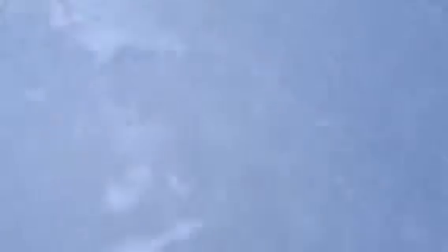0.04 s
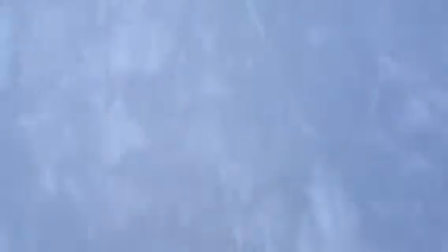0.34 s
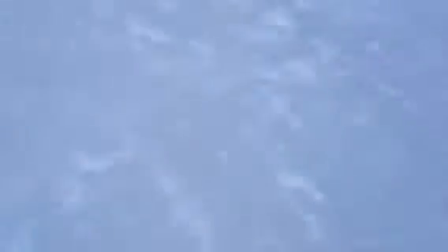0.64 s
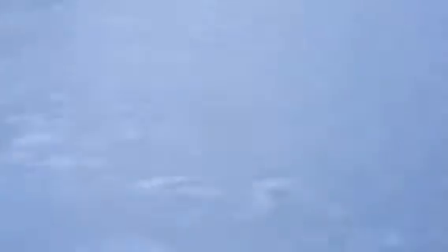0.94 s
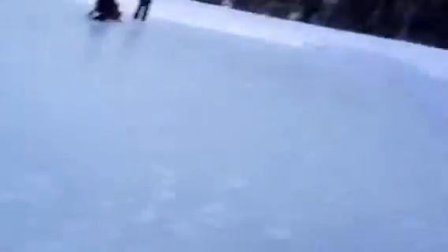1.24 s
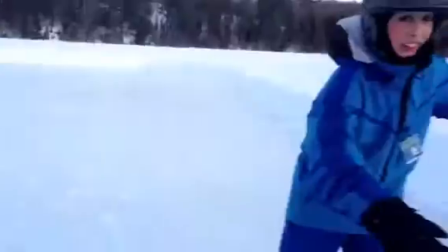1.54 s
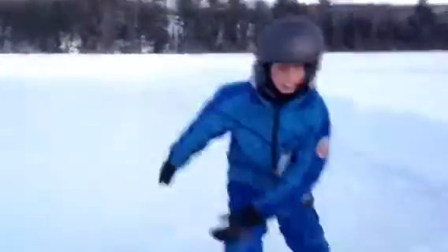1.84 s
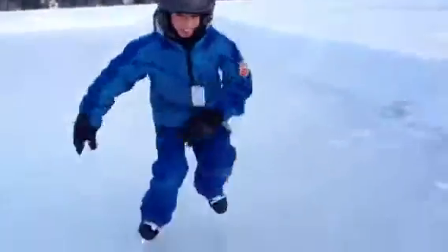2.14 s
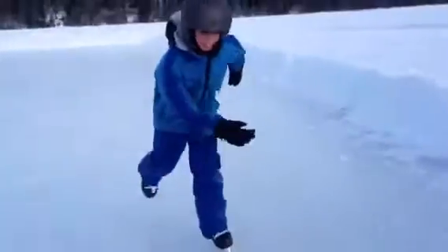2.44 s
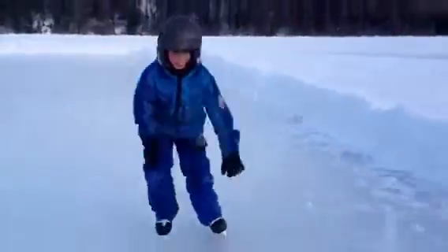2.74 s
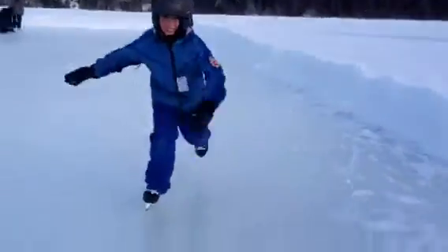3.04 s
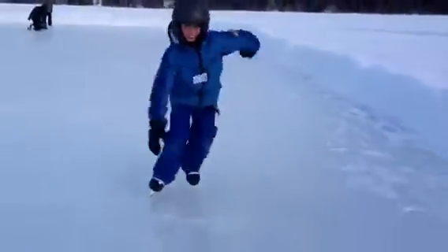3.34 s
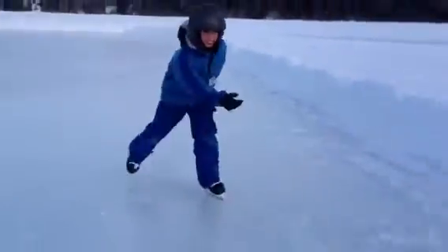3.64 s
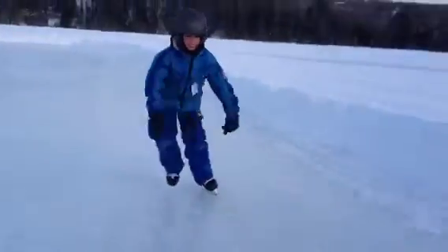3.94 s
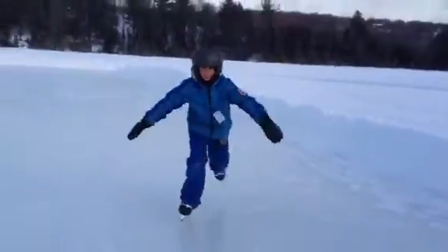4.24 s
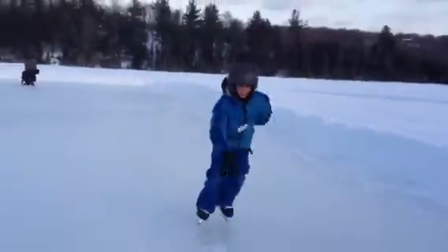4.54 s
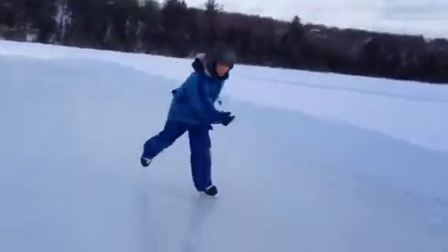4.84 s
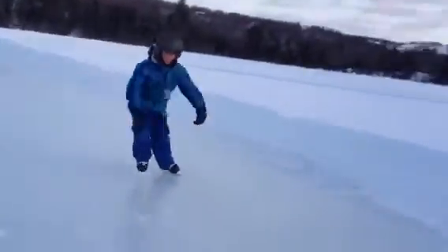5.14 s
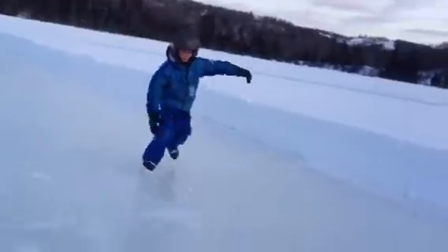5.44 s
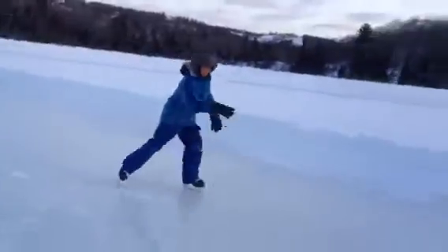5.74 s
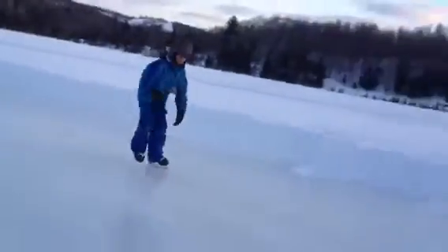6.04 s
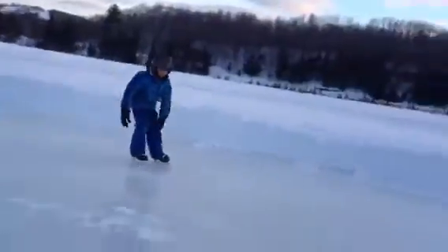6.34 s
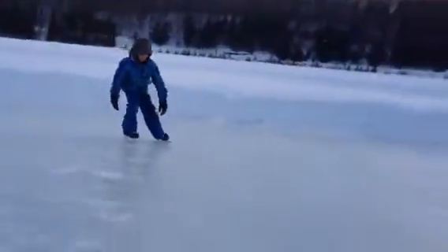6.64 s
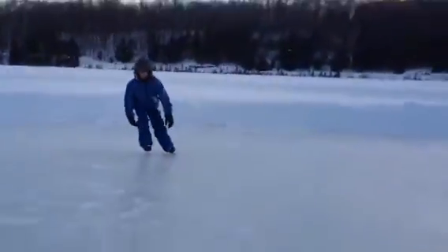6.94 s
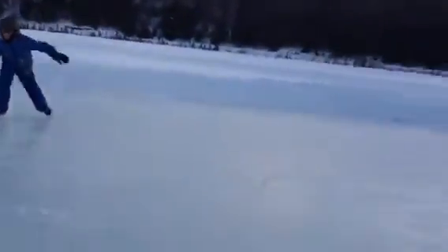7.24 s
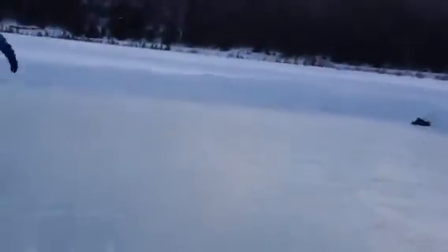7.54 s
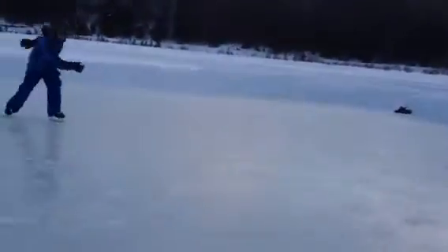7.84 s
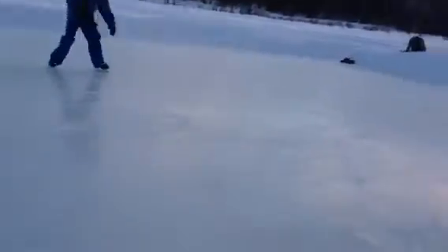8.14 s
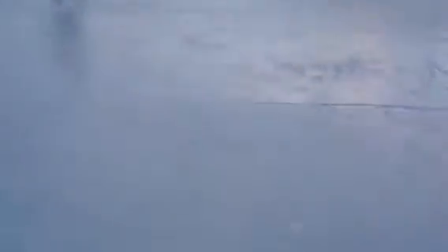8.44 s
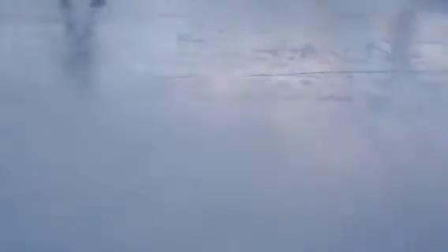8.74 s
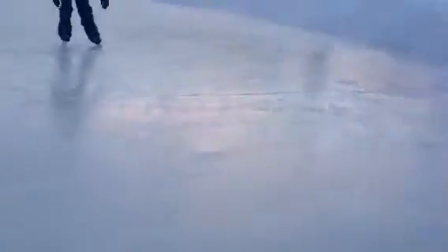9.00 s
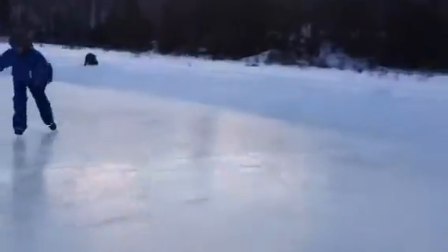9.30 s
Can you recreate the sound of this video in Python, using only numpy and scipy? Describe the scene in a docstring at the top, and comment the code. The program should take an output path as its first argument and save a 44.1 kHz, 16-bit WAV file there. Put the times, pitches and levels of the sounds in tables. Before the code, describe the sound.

Gritty hiss of skates striding across a frozen lake, with sharp blade clacks and gusts buffeting the microphone.

```python
"""Skate blades on rough lake ice: for the first second or so the microphone holder's own, close by, then a
child a few metres from the hand-held microphone, gliding along. The blades chip and chatter over grit, ringing
steel and boot; each stride lands, leans, bites and throws ice powder. Blades tick on cracks and at times sing
by stick-slip. Behind them, the air of the ride rumbles and buffets the microphone."""
import sys
import numpy as np
from scipy import signal
from scipy.fft import rfft, irfft, next_fast_len
from scipy.io import wavfile

SR = 44100
rng = np.random.default_rng(int(sys.argv[2]) if len(sys.argv) > 2 else 0)


def transcribe(u):
    """Save the signal u as a 16-bit wav file named by the first command-line argument.

    u: samples, shape (n,) or (channels, n), limited to [-1, 1]; the rate is SR.
    q: integer samples, one column per channel.
    """
    v = np.clip(np.atleast_2d(u).T, -1, 1)
    q = np.round(v * 32767).astype(np.int16)
    wavfile.write(sys.argv[1], SR, q)


N = 413216
TIME_S = np.arange(N) / SR

# airflow over the microphone: t/s, level/dB
BREEZE_LEVEL = [(0, -46), (0.55, -37), (0.82, -24), (1.15, -29.5), (1.4, -46), (2.05, -46.5), (2.55, -35),
                (3.15, -37), (3.45, -25.5), (3.82, -39), (4.4, -26), (4.8, -37), (5.3, -39.5), (5.6, -31.5),
                (6.9, -34.5), (7.5, -41.5), (8.5, -49.5), (9.37, -62)]
# airflow rumble: f/Hz, relative density/dB
BREEZE_SPECTRUM = [(25, -23), (50, -28.5), (100, -9), (170, 1), (300, -4), (600, -12), (1200, -33),
                   (3000, -62)]
# eddies on the microphone: t/s, crest rms/dB, length/s, upper edge/Hz
EDDIES = [(0.236, -19, 0.0099, 603), (0.702, -8, 0.055, 920), (0.73, -6.5, 0.021, 780),
          (0.811, -12.5, 0.075, 855), (0.844, -4, 0.02, 710), (0.86, -7.5, 0.022, 1010),
          (0.895, -10, 0.017, 1330), (0.919, -6, 0.015, 940), (1.075, -10, 0.0045, 890),
          (1.118, -15.5, 0.013, 405), (1.190, -2.5, 0.012, 860), (1.218, -10, 0.013, 855),
          (1.246, -15, 0.022, 460), (1.324, -19, 0.012, 790), (2.557, -22.5, 0.028, 340),
          (2.833, -22, 0.037, 357), (3.013, -18, 0.019, 515), (3.234, -7.5, 0.029, 606),
          (3.263, -9, 0.0094, 860), (3.4, -11, 0.022, 393), (3.579, -14.5, 0.028, 600),
          (4.189, -9, 0.017, 870), (4.283, -11, 0.021, 308), (4.344, -9, 0.0066, 251),
          (4.358, -6, 0.013, 396.6), (4.49, -13, 0.0096, 419.8), (4.638, -8.5, 0.014, 487),
          (4.93, -5.5, 0.0081, 483), (5.01, -19, 0.038, 280), (5.163, -20.5, 0.018, 397.5),
          (5.206, -13.5, 0.0055, 367), (6.302, -18, 0.0093, 300), (6.9, -16, 0.013, 397)]
# modes of boot, biting edge and blade steel: nominal f/Hz, width/Hz, share/dB
BOOT_MODES = [(317, 320, -7.5), (570, 470, -10), (947, 294, -5.5), (1322, 496, 3), (1730, 540, -5)]
EDGE_MODES = [(1400, 510, 0.5), (2570, 560, 4.5), (3580, 840, 1.5), (4500, 2100, -1.5)]
BLADE_MODES = [(3350, 640, 0), (5290, 1320, 0.5), (8520, 830, 0), (12100, 760, -16.5), (14000, 660, -13)]
# boot modes shift with lean; peaks in the steel range glide as the skater's distance changes: t/s, frequency
# ratio
BOOT_RATIO = [(0.4, 0.82), (1.6, 0.95), (3.5, 1), (4.0, 1.12), (4.8, 1.05), (5.95, 1.046), (6.8, 0.9),
              (7.05, 1.12), (8.2, 1.1), (8.8, 0.93), (9.3, 1.17)]
BLADE_RATIO = [(2.0, 0.897), (3.8, 1.003), (6.8, 0.988), (9.2, 1.01)]
# shaved ice powder: f/Hz, relative density/dB
POWDER_SPECTRUM = [(100, -33), (400, -7.5), (1500, -1.5), (2150, 2), (2700, 3.5), (3500, 0), (4200, -1),
                   (5300, 2), (6500, -0.5), (7500, 3), (9200, 2.5), (10800, -4.5), (12200, -4),
                   (14600, -11)]
# stick-slip tones: start/s, end/s, first f/Hz, last f/Hz, width/Hz, level/dB
SLIP_TONES = [(0.483, 0.527, 5500, 5470, 900, -22.5), (1.07, 1.225, 7450, 7600, 450, -35),
              (1.509, 1.73, 2840, 2800, 130, -39), (3.377, 3.496, 1350, 1600, 450, -27),
              (4.68, 5.087, 1510, 1440, 380, -27), (4.938, 5.13, 2300, 2650, 750, -28),
              (5.617, 5.7, 504, 490, 300, -26.5), (5.8, 6.54, 1480, 1400, 380, -34),
              (6.221, 6.53, 2450, 2520, 350, -34), (6.52, 6.94, 4650, 4650, 400, -28.5),
              (6.36, 6.96, 5250, 5130, 260, -29.5), (6.55, 6.906, 1090, 1230, 420, -27.5),
              (6.359, 6.993, 8430, 8360, 520, -29), (7.55, 7.9, 1490, 1430, 220, -25.5),
              (7.568, 7.925, 2570, 2600, 45, -31), (7.57, 7.89, 650, 720, 250, -31),
              (7.68, 7.92, 2250, 2750, 500, -27.5), (8.022, 8.135, 395, 180, 80, -30.5),
              (8.161, 8.298, 1450, 1300, 550, -28.5), (8.248, 8.46, 5650, 4800, 260, -36),
              (8.427, 8.5, 484, 484, 350, -27), (8.62, 9.05, 1400, 1220, 620, -29.5)]
# blade strikes on ice: t/s, relative level/dB, brightness/dB
STRIKES = [(0.193, -0.5, -24), (0.5094, -8, -5), (1.3937, -25, -12), (1.929, -12.5, -13),
           (1.9794, -15.5, -12), (2.319, -9, -18), (2.772, -10.5, -7.5), (3.477, -6, -8),
           (3.6463, -2.5, -13), (3.673, -6, -5.5), (3.6983, -7.5, -10), (3.7412, -9.5, -14),
           (3.7665, -6, -1.5), (3.8878, -4.5, -7), (4.0652, -4, -20), (4.532, -5, -13), (4.6773, -7.5, -17),
           (4.818, -10, -14), (5.2555, -13, -23), (5.306, -9.5, -9), (5.4149, -12, -11),
           (5.8018, -2.5, -10.5), (5.8944, -12, -12), (5.953, -8, -11), (6.0265, -13, -7),
           (6.1928, -11, -7), (6.4802, -5, -15), (6.5542, -9, -2), (7.015, -8, -16), (7.577, -0.5, -14),
           (7.9462, -12, -4), (8.0974, -16.5, 3.5), (8.1558, -7.5, -21), (8.5832, -7, -13),
           (8.6445, -11.5, -5), (8.953, -4, -26), (9.063, -24, 6), (9.159, -13.5, -1), (9.1861, -1.5, -8.5),
           (9.2555, -10, -9)]
# coasting, by speed and nearness: t/s, boot level/dB, steel re boot/dB, powder re boot/dB
GLIDE_LEVELS = [(0, -43.5, 1, -0.5), (0.3, -35, -3, -2.5), (0.8, -39.5, -8, -5), (1.05, -37.5, -10, -2.5),
                (1.33, -43, -3, -4.5), (2.1, -42.5, -6, -5.5), (2.85, -42.5, -1, 6), (3.4, -35, -2.5, 0),
                (4.3, -41.5, 4.5, 6), (4.72, -32.5, -7, -0.5), (5.2, -44.5, 1.5, 5), (5.35, -37.5, 0, 0),
                (5.6, -34, -4.5, 0), (6.9, -33, 0.5, -4), (7.25, -33.5, -9, -3.5), (8.0, -31, -7.5, -0.5),
                (8.9, -35, -4.5, 3.5), (9.1, -44, 3.5, 4.5), (9.37, -35, 4.5, -2)]
# blade set down: t/s, attack/s, boot level/dB, steel re boot/dB
TOUCHDOWNS = [(0.49, .011, -37, 11.5), (1.11, .011, -45.5, 7), (1.825, 0.048, -38.5, -3.5),
              (2.585, 0.028, -44, 8.5), (3.59, 0.014, -29, -2), (3.862, 0.017, -37, 3.5),
              (5.3, 0.021, -39.5, 5), (5.765, 0.023, -33, -2.5), (6.44, 0.014, -31, 1),
              (7.56, 0.0081, -25.5, -7), (9.32, 0.04, -33.5, 1)]
# leaning on one blade: start/s, hardest/s, end/s, boot level/dB, skid/0-1, powder re boot/dB
LEANS = [(0.274, 0.48, 0.54, -26, 0.33, -8), (0.418, 0.624, 0.75, -33, 0.15, 9.5),
         (1.395, 1.57, 1.83, -36.5, 0.17, -8.5), (2.217, 2.29, 2.47, -39.5, 0.7, -16),
         (3.27, 3.45, 3.53, -29.5, 0.4, -2.5), (3.816, 3.875, 4.01, -26, 0.74, -17),
         (3.933, 4.103, 4.13, -30, 0.66, -3), (4.712, 4.925, 5.17, -31.5, 0.5, 0),
         (4.876, 5.03, 5.125, -32.5, 1, -2), (5.588, 5.687, 5.7, -30, 0.5, -2),
         (5.89, 6.112, 6.3, -28.5, 0.23, -8), (6.146, 6.41, 7.03, -35, 1, 3.5),
         (6.427, 6.644, 7.46, -29, 0, -14), (6.584, 6.787, 7.01, -26.5, 0, 0),
         (7.546, 7.67, 7.89, -28, 0.9, 1.5), (7.68, 7.84, 7.93, -28, 0.7, -1),
         (8.16, 8.433, 8.7, -34.5, 0.3, 7.5)]


def from_db(db):
    """Decibels to gain."""
    return 10 ** (np.asarray(db) / 20)


def unit_rms(x):
    """Scale to rms 1."""
    return x / np.sqrt(np.mean(x ** 2) + 1e-20)


def curves(rows):
    """Each column after t/s, interpolated per sample."""
    times_s, *columns = np.transpose(rows)
    return [np.interp(TIME_S, times_s, column) for column in columns]


def butter(x, hz, kind, order=2):
    """Causal low- or high-pass."""
    return signal.sosfilt(signal.butter(order, hz, kind, fs=SR, output="sos"), x)


def drift(rate_hz):
    """Random curve with rate_hz knots a second; rms 1."""
    knots = np.clip(rng.standard_normal(20000), -2.3, 2.3)
    return unit_rms(np.interp(TIME_S * rate_hz, np.arange(len(knots)), knots))


def coloured_noise(spectrum):
    """Noise of the given spectral shape; rms 1."""
    size = next_fast_len(N)
    hz, db = np.transpose(spectrum)
    bins_hz = np.arange(size // 2 + 1) * SR / size
    gain = from_db(np.interp(np.log(bins_hz + 1), np.log(hz), db))
    return unit_rms(irfft(rfft(rng.standard_normal(size)) * gain, size)[:N])


def ring(force, phase_rad, width_hz):
    """Random crushing shakes one damped mode; keeps the force's level."""
    pole = np.exp(-np.pi * 1.5 * width_hz / SR)  # doubled pole: about width_hz wide at -3 dB
    carrier = np.exp(1j * phase_rad)
    drive = force * rng.standard_normal(len(force)) * carrier.conj()
    swing = signal.lfilter([1], [1, -2 * pole, pole ** 2], drive + 1e-18)
    return (swing * carrier).real * np.sqrt(2 * (1 - pole ** 2) ** 3 / (1 + pole ** 2))


def driven_modes(force, modes, ratio, waver_db, wander):
    """Mode shares and pitches waver as the contact point moves along the blade."""
    norm = np.sqrt(sum(from_db(db) ** 2 for _, _, db in modes))
    rad_per_hz = 2 * np.pi * np.cumsum(ratio * (1 + wander * drift(13))) / SR
    return sum(from_db(db + waver_db * drift(35)) * ring(force, hz * rad_per_hz, width_hz)
               for hz, width_hz, db in modes) / norm


def struck_modes(modes, ratio, age_s):
    """One blow sets the modes swinging; broad ones die first."""
    hz, width_hz, db = np.transpose(modes)[:, :, None]
    decay = np.pi * 1.5 * width_hz * age_s
    envelope = from_db(db) * decay * np.exp(1 - decay)
    swing = np.sin(2 * np.pi * (hz * ratio * age_s + rng.random(hz.shape)))
    return np.sum(envelope * swing, axis=0) / np.sqrt(np.sum(from_db(db) ** 2))


def wind(lumpy_db, port_hz, rise_share):
    """Lumpy rumble at the microphone port; eddies thump, faster ones higher and with less bass."""
    breeze_db, = curves(BREEZE_LEVEL)
    out = from_db(breeze_db + lumpy_db * drift(35)) * coloured_noise(BREEZE_SPECTRUM)
    half = SR // 10
    age_s = (np.arange(2 * half) - half) / SR
    for t_s, db, length_s, edge_hz in EDDIES:
        flank_s = length_s * np.where(age_s < 0, rise_share, 1)
        swell = np.exp(-2 * np.abs(age_s / flank_s) ** 1.05)
        swirl = butter(rng.standard_normal(2 * half), 0.42 * edge_hz, "low", order=1)
        swirl = butter(swirl, 1.04 * edge_hz, "low")
        eddy = butter(swirl * swell, port_hz + 0.11 * edge_hz, "high", order=3)
        start = int(t_s * SR) - half
        out[start:start + 2 * half] += from_db(db) * unit_rms(eddy) * np.sqrt(np.mean(swell ** 2))
    return out


def singing(rasp_db, crest_skew):
    """Friction feeds one mode in uneven slips, building until the blade lets go."""
    out = np.zeros(N)
    slips = unit_rms(from_db(rasp_db * drift(150)))
    for start_s, end_s, first_hz, last_hz, width_hz, db in SLIP_TONES:
        at = slice(int(start_s * SR), int(end_s * SR))
        size = len(TIME_S[at])
        swell = np.sqrt(np.abs(np.sin(np.pi * np.linspace(0, 1, size) ** crest_skew)))
        phase_rad = 2 * np.pi * np.cumsum(np.linspace(first_hz, last_hz, size)) / SR
        out[at] += ring(from_db(db) * swell * slips[at], phase_rad, width_hz)
    return out


def ticks(boot_ratio, blade_ratio, boot_db, steel_db, max_rebound_s, rebound_db, crack_s, crumbs_s):
    """A strike knocks boot and steel and rebounds; ice cracks, crumbs rattle. Gives knocks, ice force."""
    knocks, crack = np.zeros((2, N))
    age_s = TIME_S[:SR // 20]
    fracture = np.exp(-age_s / crack_s) + from_db(-20) * np.exp(-age_s / crumbs_s)
    for t_s, db, bright_db in STRIKES:
        rebound_s = t_s + max_rebound_s * rng.uniform(0.505, 1)
        for touch_s, touch_db in ((t_s, db), (rebound_s, db + rebound_db)):
            start = int(touch_s * SR)
            at = slice(start, start + len(age_s))
            boot = from_db(boot_db) * struck_modes(BOOT_MODES, boot_ratio[start], age_s)
            steel = from_db(bright_db + steel_db) * struck_modes(BLADE_MODES, blade_ratio[start], age_s)
            knocks[at] += from_db(touch_db) * (boot + steel)
            crack[at] += from_db(touch_db + bright_db) * fracture
    return knocks, crack


def glide():
    """Coasting blades: power in boot, steel, powder."""
    boot_db, steel_db, powder_db = curves(GLIDE_LEVELS)
    return from_db([boot_db, boot_db + steel_db, boot_db + powder_db]) ** 2


def landings(decay_s, powder_re_steel_db):
    """A blade set down scuffs, then settles into its track: power in boot, steel, powder."""
    power = np.zeros((3, N))
    for t_s, attack_s, db, steel_db in TOUCHDOWNS:
        at = slice(int(t_s * SR), int(t_s * SR) + SR)
        age_s = TIME_S[at] - TIME_S[at][0]
        scuff = np.minimum(age_s / attack_s, 1) * np.exp(-np.maximum(age_s - attack_s, 0) / decay_s)
        gains = from_db([db, db + steel_db, db + steel_db + powder_re_steel_db])
        power[:, at] += np.outer(gains, scuff) ** 2
    return power


def strokes(sharpness, pitch_rise, hold_share, steel_db, bite_db):
    """Pressure builds and eases. A running blade rings; a skidding one bites, higher toward the toe."""
    power, bite_power, edge_ratio = np.zeros((3, N)), np.zeros(N), np.ones(N)
    for start_s, hardest_s, end_s, db, skid, powder_db in LEANS:
        at = slice(int(start_s * SR), int(end_s * SR))
        pressure = np.interp(TIME_S[at], [start_s, hardest_s, end_s], [0, 1, 0])
        held = hold_share * skid * (TIME_S[at] > hardest_s)
        swell = from_db(db) ** 2 * np.sin(pressure * np.pi / 2) ** (sharpness * (1 - held))
        shares = [1, (1 - skid) * from_db(steel_db) ** 2, from_db(powder_db) ** 2]
        power[:, at] += np.outer(shares, swell)
        bite_power[at] += skid * from_db(bite_db) ** 2 * swell
        edge_ratio[at] = 1 + pitch_rise * (TIME_S[at] - hardest_s) / (end_s - start_s)
    return power, np.sqrt(bite_power), edge_ratio


def grit(chips_per_s, spread_db, crumble_s, smooth_share):
    """Force of uneven chips loading and breaking at random, over smooth sliding friction; rms 1."""
    sizes = from_db(spread_db * np.minimum(rng.exponential(1, N), 3.5))
    breaks = rng.random(N) < chips_per_s / SR
    pole = np.exp(-1 / (crumble_s * SR))
    power = signal.lfilter([1], [1, -pole], sizes ** 2 * breaks + 1e-18)
    power = signal.lfilter([1], [1, -pole ** 2], power[::-1])[::-1]  # stress builds before each break
    return np.sqrt(smooth_share + (1 - smooth_share) * power / power.mean())


def skates(even_from_db, shave_share_per_db):
    """The same chips drive boot and steel; a light blade chatters, a loaded one shaves more evenly."""
    stroke_power, bite, edge_ratio = strokes(sharpness=2.85, pitch_rise=0.18, hold_share=0.52,
                                             steel_db=-3.5, bite_db=-1.5)
    power = glide() + stroke_power + landings(decay_s=0.05, powder_re_steel_db=4.5)
    boot_db, steel_db, powder_db = 10 * np.log10(power)
    boot_ratio, = curves(BOOT_RATIO)
    blade_ratio, = curves(BLADE_RATIO)
    bumps = from_db(1.26 * drift(110))
    chatter = bumps * grit(chips_per_s=700, spread_db=3.5, crumble_s=0.00088, smooth_share=0.21)
    shaving = grit(chips_per_s=2700, spread_db=7.0, crumble_s=0.00028, smooth_share=0.55)
    shave_share = np.clip((boot_db - even_from_db) * shave_share_per_db, 0, 0.6)
    contact = np.sqrt((1 - shave_share) * chatter ** 2 + shave_share * shaving ** 2)
    scrape = np.sqrt((contact ** 2 + shaving ** 2) / 2)
    knocks, crack = ticks(boot_ratio, blade_ratio, boot_db=-6.0, steel_db=4.0, max_rebound_s=0.004,
                          rebound_db=-7.5, crack_s=0.001, crumbs_s=0.003)
    boot = driven_modes(from_db(boot_db) * contact, BOOT_MODES, boot_ratio, waver_db=2.0, wander=0.02)
    edge = driven_modes(bite * scrape, EDGE_MODES, edge_ratio, waver_db=3.5, wander=0.02)
    steel = driven_modes(from_db(steel_db) * contact, BLADE_MODES, blade_ratio,
                         waver_db=3.0, wander=0.012)
    powder = (from_db(powder_db) * scrape + from_db(-6.5) * crack) * coloured_noise(POWDER_SPECTRUM)
    return boot + edge + steel + powder + knocks


def scene():
    """Wind and skates in open air; mono, no echo."""
    air = wind(lumpy_db=4.0, port_hz=108, rise_share=0.7)
    skating = skates(even_from_db=-29.0, shave_share_per_db=1 / 16.5)
    skating += singing(rasp_db=3.5, crest_skew=1.42)
    return (air + butter(skating, 180, "high", order=3))[None]


def record(dry):
    """Soft peak limit, then deep bass and top cut."""
    ceiling, low_hz, top_hz = 0.48, 60, 15500
    rounded = dry / (1 + (dry / ceiling) ** 4) ** (1 / 4)
    top_cut = signal.ellip(12, 0.1, 80, top_hz, fs=SR, output="sos")
    return signal.sosfilt(top_cut, butter(rounded, low_hz, "high", order=3))


dry = scene()
out = record(dry)
transcribe(out)
```